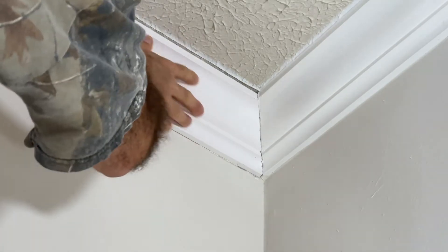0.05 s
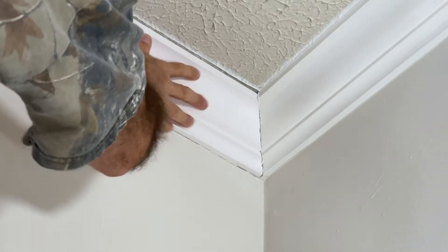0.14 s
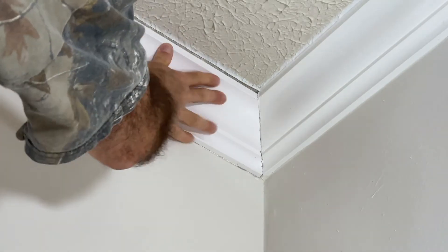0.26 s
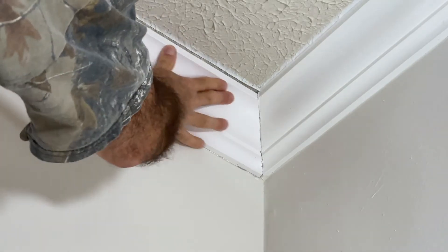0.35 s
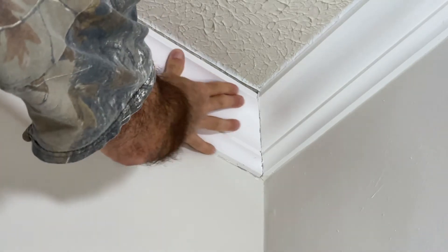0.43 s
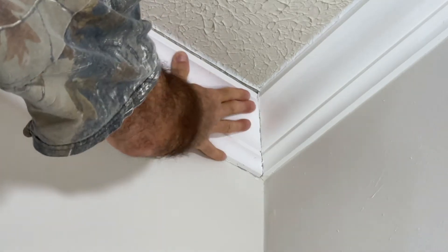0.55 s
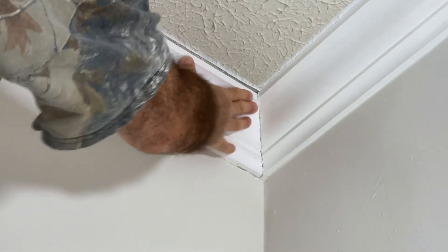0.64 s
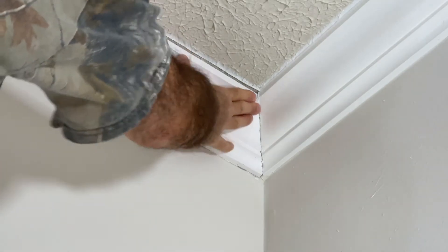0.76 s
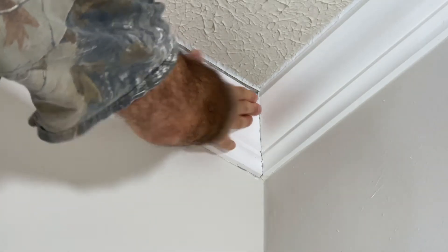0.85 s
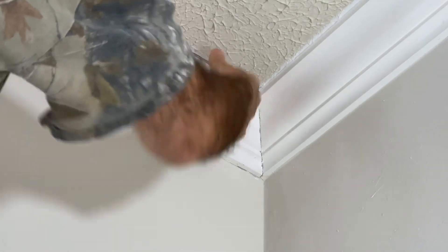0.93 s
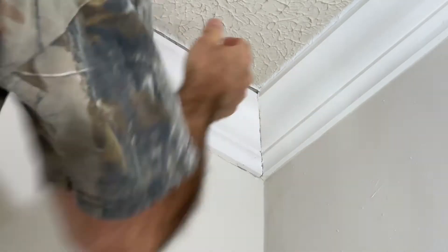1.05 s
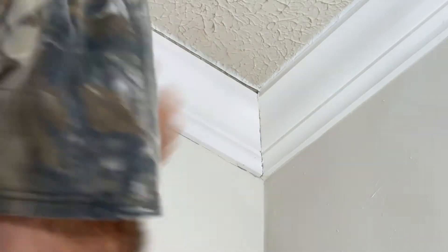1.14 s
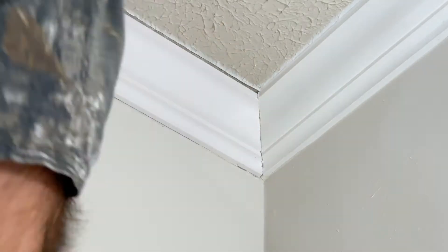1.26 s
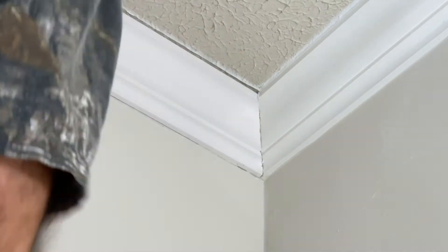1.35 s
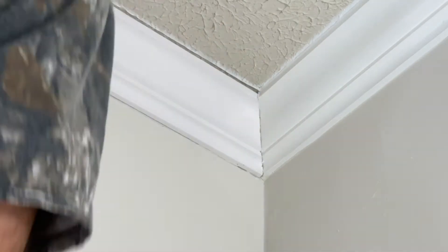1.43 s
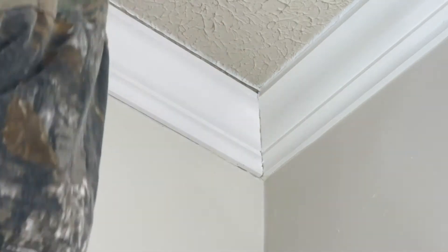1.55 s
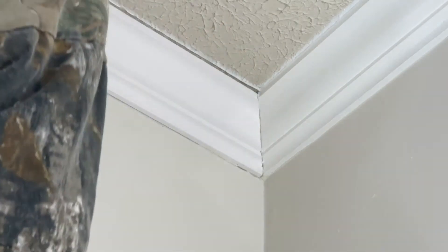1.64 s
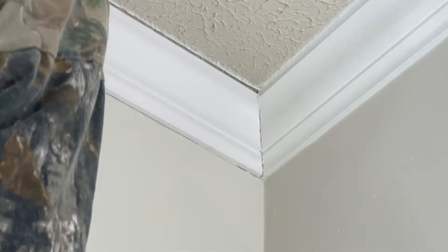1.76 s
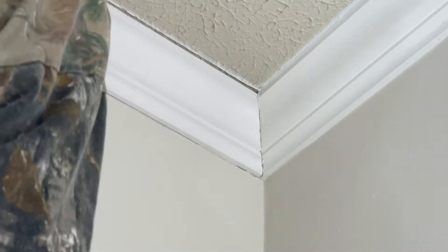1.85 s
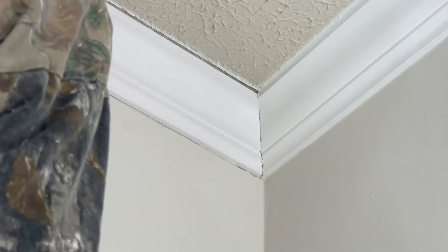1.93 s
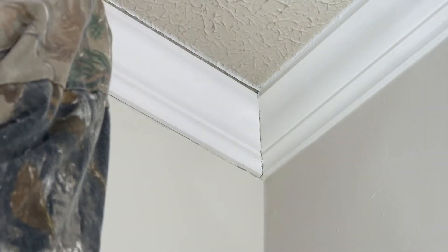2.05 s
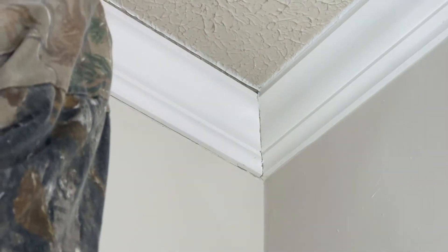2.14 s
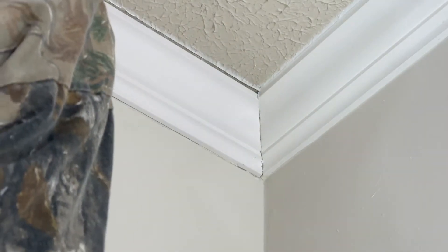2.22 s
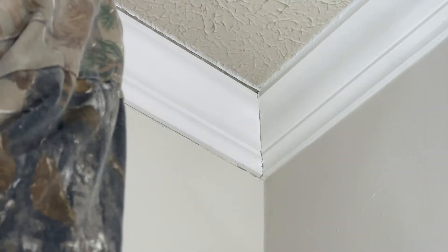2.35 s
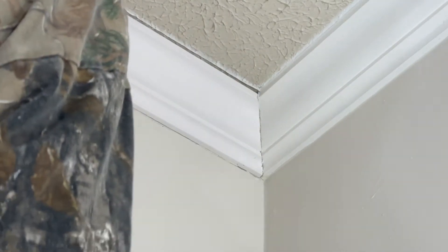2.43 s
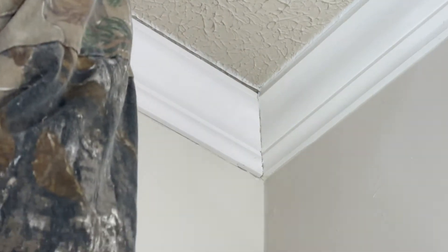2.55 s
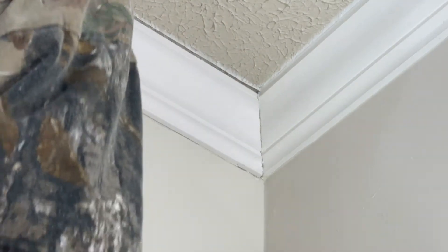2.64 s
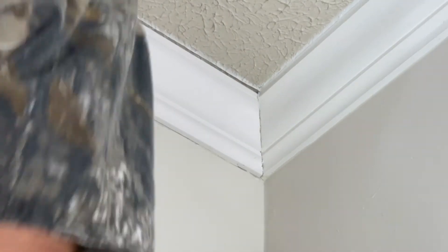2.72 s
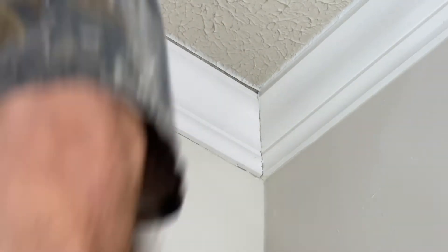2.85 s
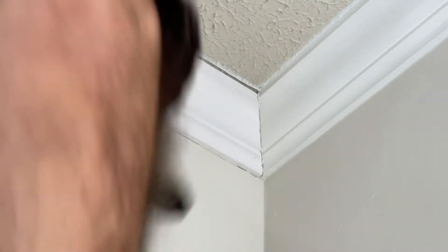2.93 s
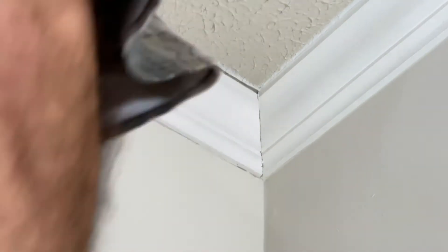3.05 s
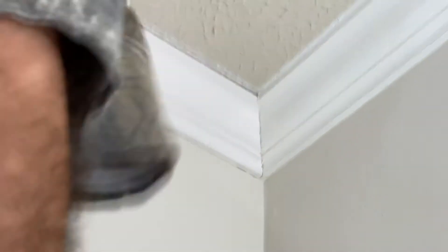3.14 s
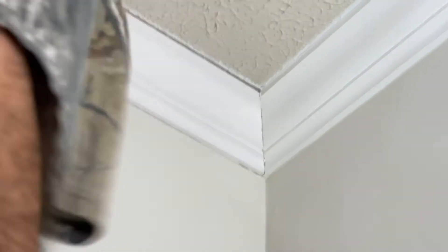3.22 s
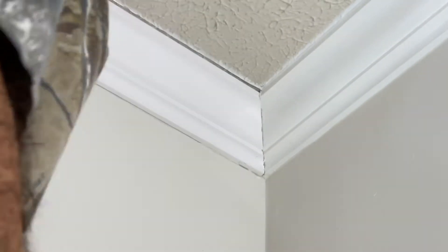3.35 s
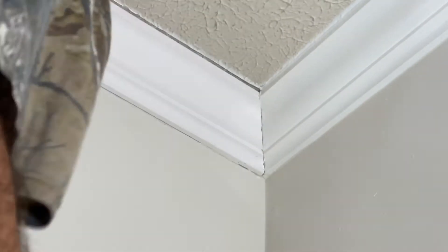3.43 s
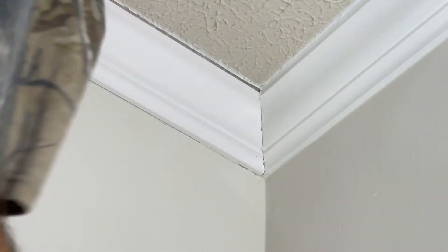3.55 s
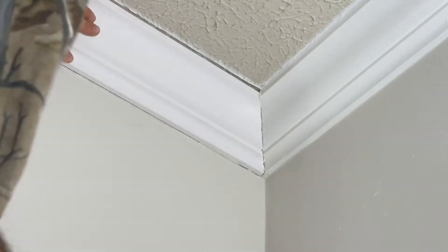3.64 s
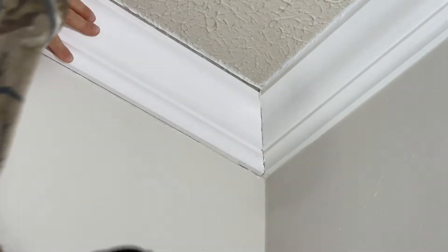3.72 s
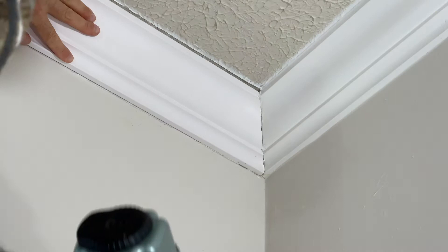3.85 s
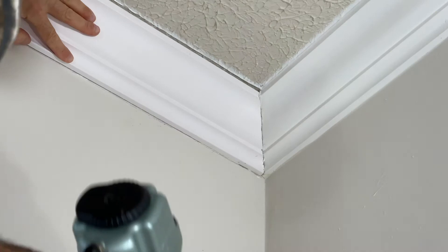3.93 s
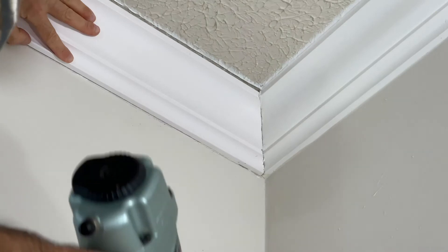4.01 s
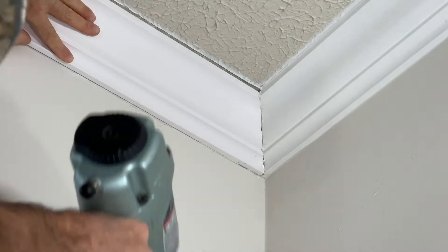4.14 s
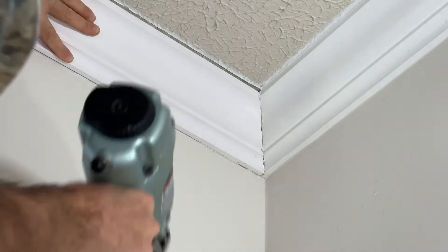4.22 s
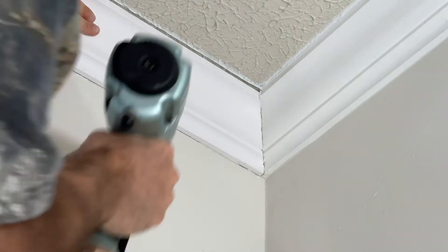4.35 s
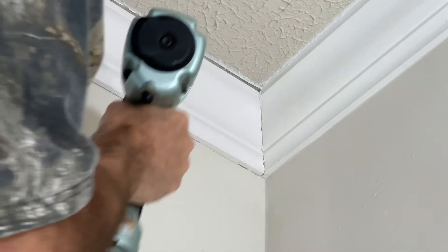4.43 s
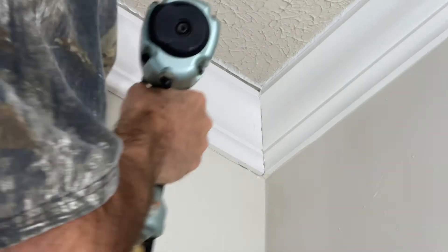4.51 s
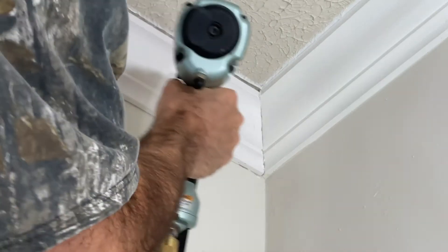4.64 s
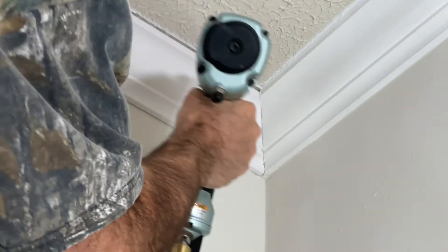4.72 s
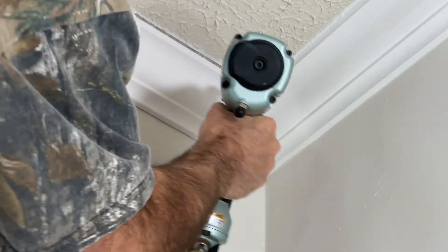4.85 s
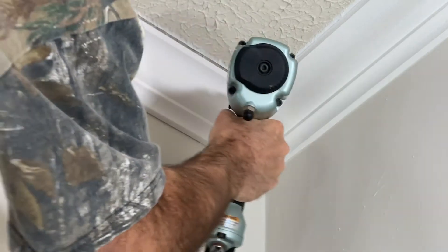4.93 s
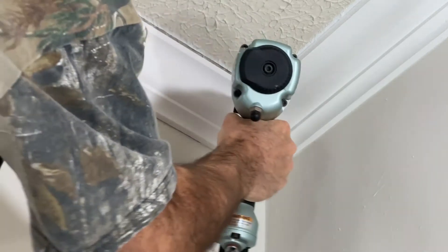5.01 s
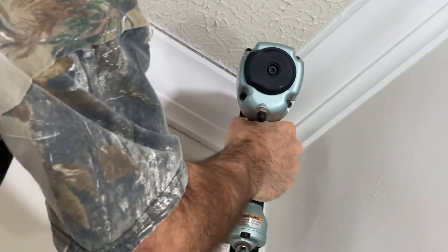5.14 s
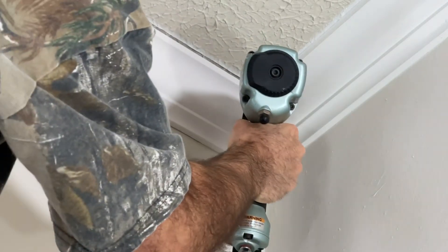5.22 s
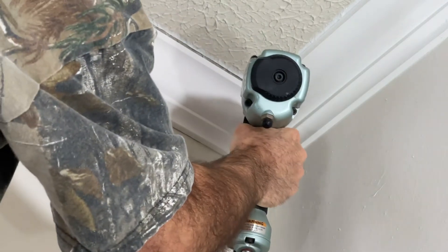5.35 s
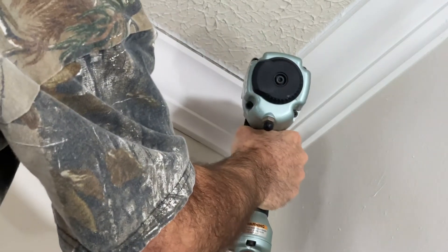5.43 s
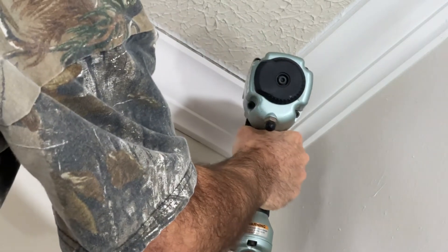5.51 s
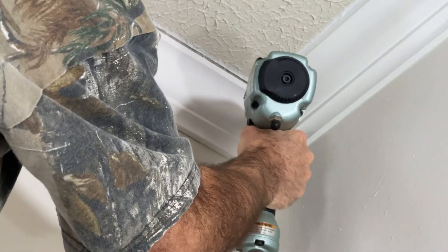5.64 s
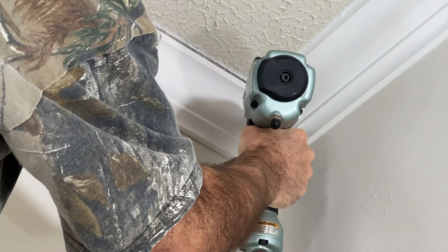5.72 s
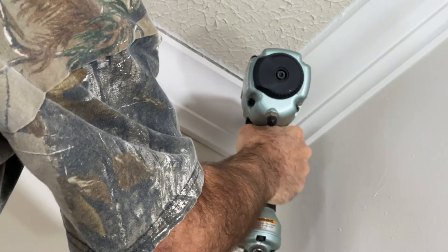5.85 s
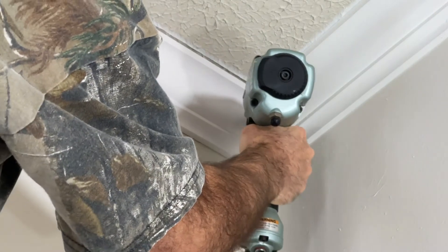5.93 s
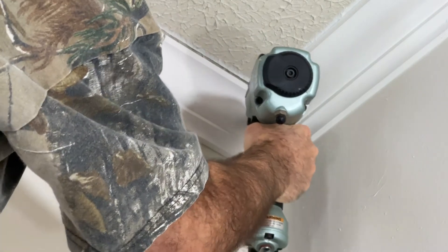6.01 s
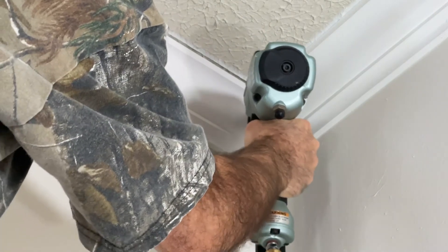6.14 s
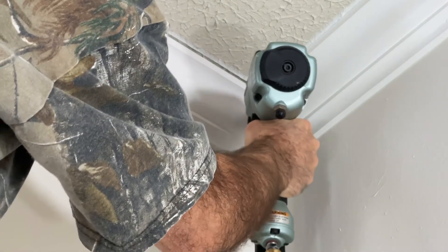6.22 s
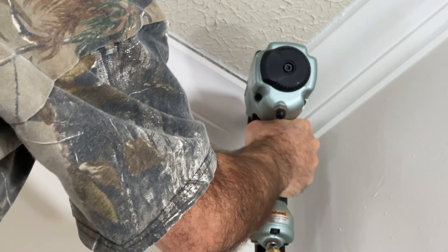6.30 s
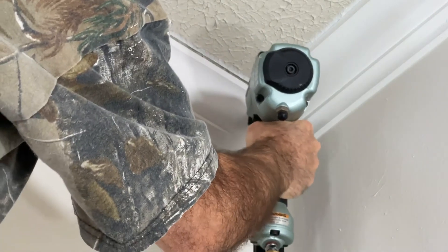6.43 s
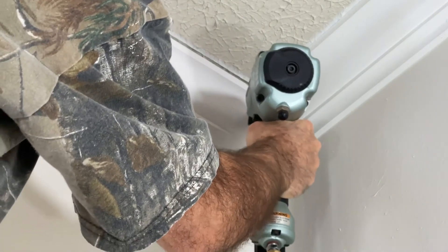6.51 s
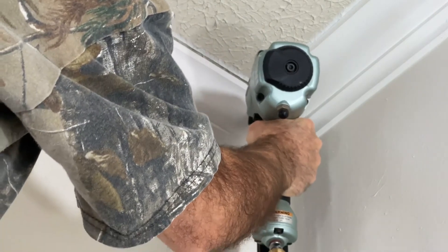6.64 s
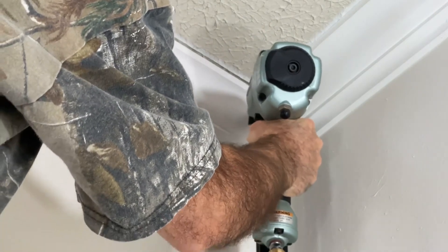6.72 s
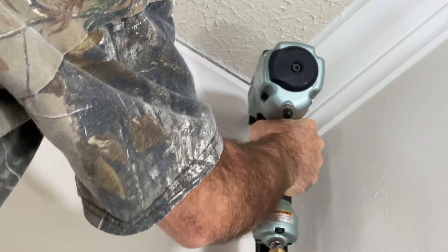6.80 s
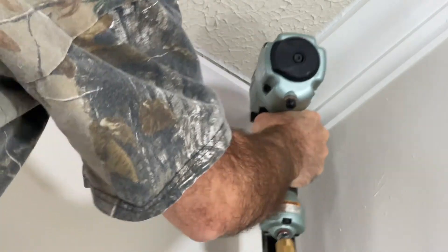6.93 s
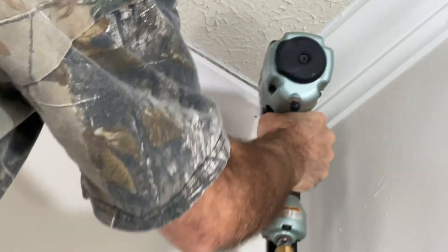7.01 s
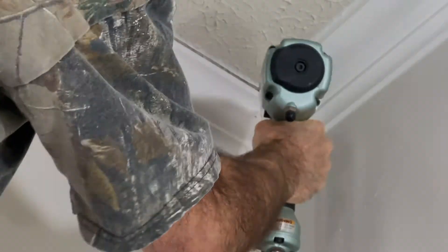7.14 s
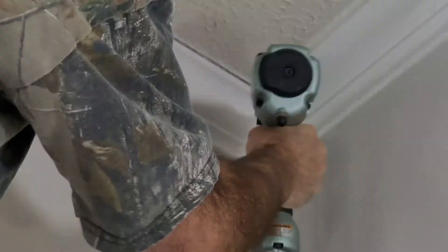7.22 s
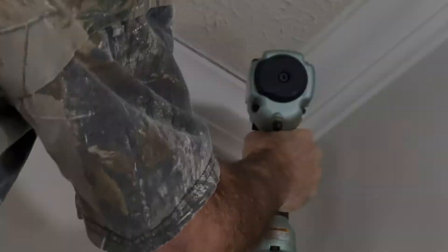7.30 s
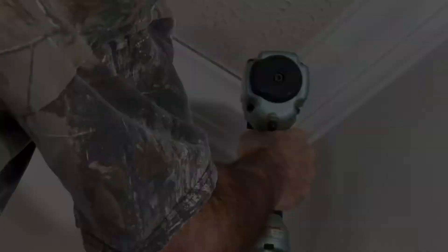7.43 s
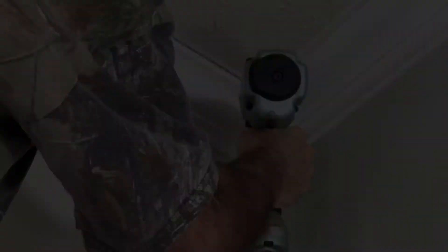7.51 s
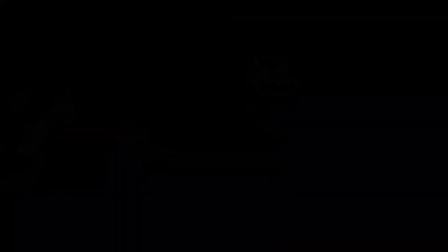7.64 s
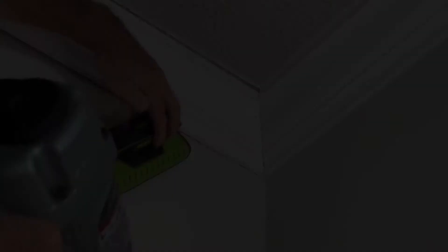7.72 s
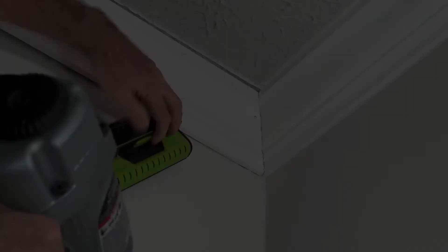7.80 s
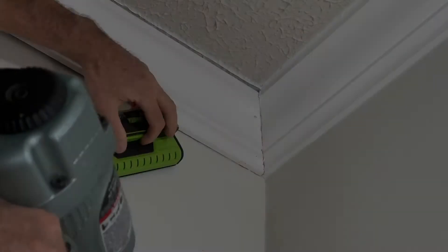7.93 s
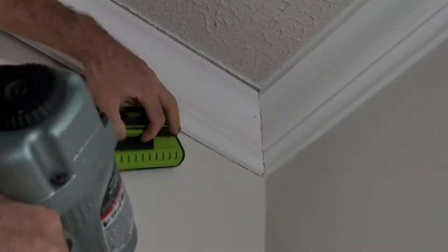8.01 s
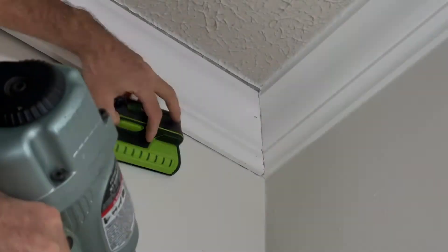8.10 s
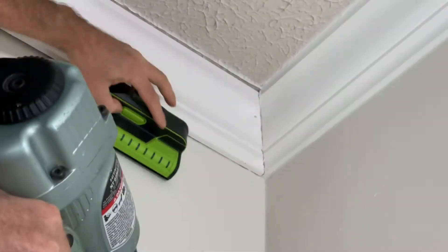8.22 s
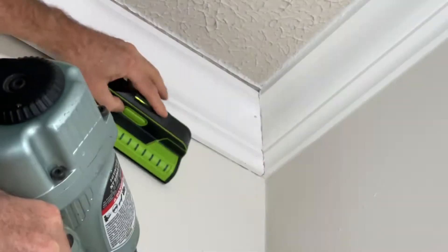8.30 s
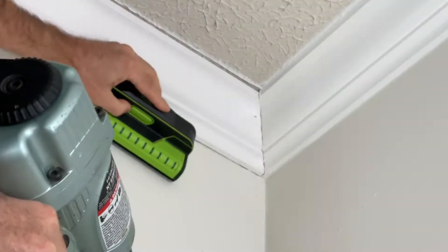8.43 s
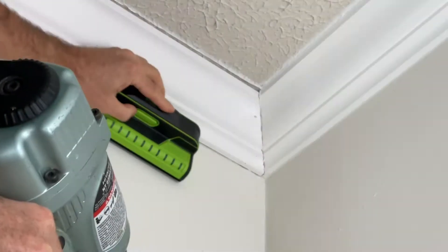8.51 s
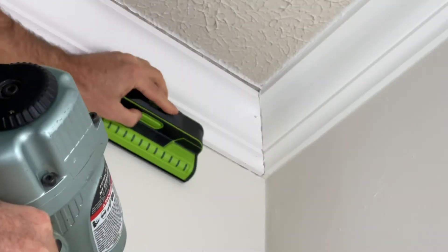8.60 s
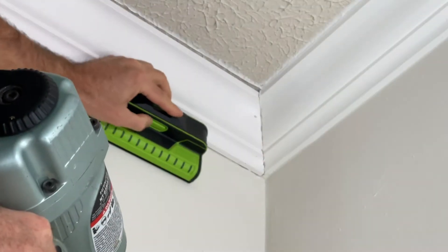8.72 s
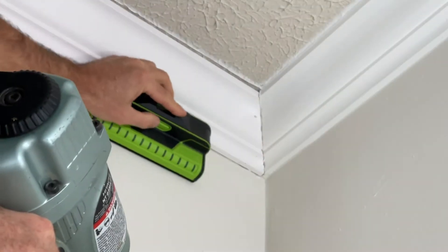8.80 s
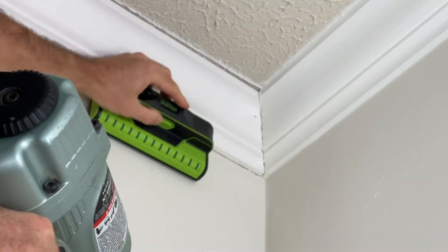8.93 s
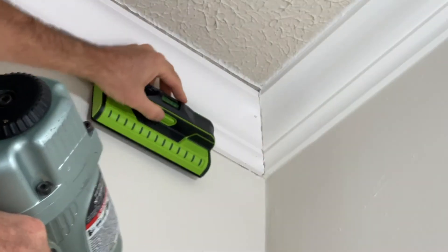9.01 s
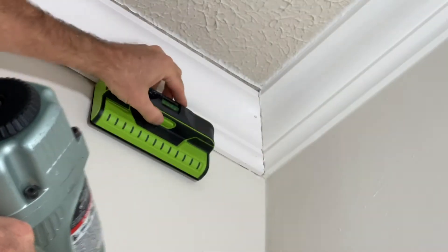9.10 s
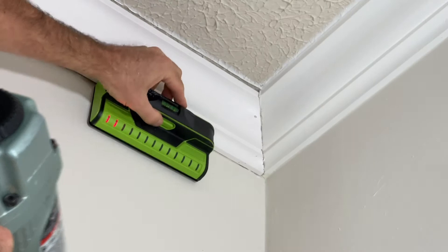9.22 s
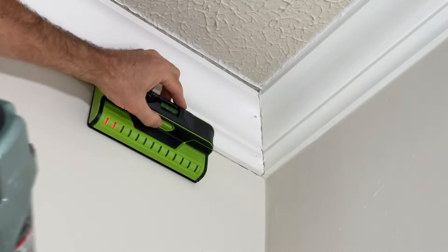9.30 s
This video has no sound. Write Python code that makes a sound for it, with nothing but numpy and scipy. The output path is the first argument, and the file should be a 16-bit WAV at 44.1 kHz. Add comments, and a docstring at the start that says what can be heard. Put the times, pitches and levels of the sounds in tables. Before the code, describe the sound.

Quiet handling of molding near the microphone: faint thumps, rubbing skin, brushing cloth, small clicks and squeaky slips. Firmer wooden knocks follow as a nailer is placed. One violent air-driven shot cracks, with short room tail, followed by a bright exhaust burst and soft refill hiss. After a quick fade, low thuds and short gritty plastic slides return over a faint room rumble.

```python
"""Crown molding is pressed into a ceiling corner of a bare room: struck modes knock, slipping skin squeaks,
strokes of shaped noise rustle and rub. A pneumatic nailer then fires once: a valve chirp, noise bursts with
metal ringing for driver blow and recoil, a thump in the wall, an exhaust puff and a refill hiss.
The sound fades far down, then returns with a plastic stud finder set down and slid on the wall as scraping
noise. A room tail follows the sources; a faint rumble and hiss lie under everything."""
import sys
import numpy as np
from scipy import signal
from scipy.fft import rfft, irfft, next_fast_len
from scipy.io import wavfile
from scipy.ndimage import uniform_filter1d, map_coordinates

SR = 44100
rng = np.random.default_rng(int(sys.argv[2]) if len(sys.argv) > 2 else 0)


def persist_wave(psi):
    """Save psi, clipped to +-1, as 16-bit WAV."""
    counts = np.round(np.clip(psi, -1, 1) * 32767).astype(np.int16)
    wavfile.write(sys.argv[1], SR, np.atleast_2d(counts).T)


N = 412731

# blows of the shot: (time [s], level [dB], rise [s], t60 [s], treble tilt [dB/octave], ring [Hz], ring level [dB])
BLOWS = [(6.8127, -14, 0.0011, 0.088, 4, 9300, -7), (6.8204, -5.5, .0006, 0.011, -1.5, 2780, -8.5),
         (6.8401, -7.5, 0.00042, 0.032, 1, 1215, 1.5), (6.8448, -13.5, 0.00067, 0.033, -1, 8700, -14.5)]
# colour of the blows before tilt: (frequency [Hz], level [dB])
CRACK_TONE = [(150, -14), (500, 3), (750, -9), (1250, 2), (2000, -8.5), (3000, -3), (4500, -9.5),
              (7000, -14.5), (8800, -7.5), (10500, -4.5), (12000, -12), (14000, -26), (16000, -36)]
# ringing of the nailer's housing: (frequency [Hz], width [Hz], average level [dB])
HOUSING_MODES = [(1277, 71, 3.5), (1992, 84, -7), (3030, 73, 5.5), (4170, 41, -18), (4160, 83, -23.5),
                 (4404, 71, -17), (5100, 49, -21.5), (6420, 82, -8), (7510, 150, -29), (8100, 97, -17),
                 (8400, 89, 7), (10100, 33, 3.5)]
# air whistling through the opening valve: (frequency [Hz], level [dB])
VALVE_TONE = [(200, -28.5), (520, -10.5), (850, -30), (1150, -23.5), (1600, -4.5), (2150, -2), (2600, -34),
              (3300, -14.5), (4300, -44.5), (5700, -25), (6300, -36.5), (7250, -28), (12500, -34),
              (14000, -54.5)]
# colour of the exhaust puff: (frequency [Hz], level [dB])
PUFF_TONE = [(40, 4.5), (100, 3), (300, 0.5), (700, -8), (1500, -12.5), (4500, -12), (5700, -5.5),
             (6500, -7.5), (8600, 0), (10300, 9.5), (11800, -1), (13500, -12), (16000, -22.5)]
# colour of the refill hiss: (frequency [Hz], level [dB])
REFILL_TONE = [(60, -6), (300, -16.5), (900, -16.5), (2400, -10), (3300, 0), (4500, -4), (6300, 1),
               (8500, -1.5), (11000, 8.5), (12500, -10.5), (15000, -13.5)]
# colour of air buffeting the microphone: (frequency [Hz], level [dB])
DRAUGHT_TONE = [(12, -9), (30, -1.5), (60, 4), (115, -3), (170, -17.5), (400, -43), (1500, -100)]
# small hard clicks of the tools: (time [s], level [dB], treble tilt [dB/octave], note of the clicking part [Hz])
CLICKS = [(2.1006, -52, 1.5, 4020), (2.654, -42.5, 3.5, 6540), (3.169, -42.5, 8, 9000),
          (3.216, -45.5, 5.5, 4440), (3.404, -55, 0.5, 2880), (5.777, -56, -10.5, 1670),
          (5.7992, -49, 9, 9500), (5.8837, -36, 8.5, 9160), (6.2, -56.5, 6.5, 9250),
          (6.9451, -36.5, 5.5, 2795), (8.957, -35, 1.5, 2840)]
# knocks on molding and wall: (time [s], level [dB], treble tilt [dB/octave], wall thud level [dB],
# note of the struck spot [Hz], note level in the blow [dB])
KNOCKS = [(.152, -53.5, -11.5, -46.5, 427, 4), (.505, -44, -9.5, -40, 447, 4),
          (.527, -49, -5.5, -41, 487, -8), (.568, -45, -6, -72, 446, 1), (1.278, -58, -7.5, -58, 500, 9),
          (2.202, -49.5, -2.5, -53, 1130, -10), (2.61, -51, -4.5, -59, 373, 2),
          (3.0, -31.5, -2.5, -49.5, 375, 4), (3.012, -36.5, 0.5, -61, 583, 38),
          (3.022, -45, -1, -36, 608, -8), (3.114, -38.5, -6, -45, 2400, 2),
          (3.135, -38.5, -0.5, -51, 667, 19), (3.462, -60.5, -5.5, -58, 790, 0),
          (4.801, -47.5, -4.5, -68, 1600, -9), (5.025, -42.5, -10, -47, 425, 6.5),
          (5.105, -50.5, -10.5, -44.5, 460, 16), (5.312, -33, -3.5, -44, 1014, 10),
          (5.597, -51, -5, -68, 1490, -3), (5.864, -30, -1.5, -41.5, 1640, 0),
          (5.878, -28, -2.5, -36.5, 636, 7.5), (5.907, -40.5, -2, -46, 1275, 11),
          (6.229, -49.5, -5.5, -51.5, 302, 11.5), (6.329, -48, -1, -49.5, 1023, -2.5),
          (6.495, -53.5, -6.5, -56.5, 313, 2.5), (6.717, -50, -3, -50, 394.6, 3),
          (6.736, -46, -5.5, -46.5, 292.5, 1.5), (7.7, -32.5, -3, -24, 329, -15),
          (7.708, -38, -3.5, -38, 1636, 12), (8.055, -39.5, -3.5, -27, 634, 4),
          (8.07, -42, -2.5, -28.5, 395, 13), (8.199, -45, -2.5, -38, 472, 5),
          (8.303, -35.5, -3, -34, 318.4, 2), (8.313, -38.5, -3.5, -34, 472, 14),
          (8.657, -45.5, -4, -40, 306, 0), (8.836, -44.5, -7.5, -40, 571, 3),
          (8.975, -45.5, -8.5, -43, 564, -2), (9.275, -42.5, -2, -42.5, 479, -7.5)]
# bands in which knocks and clicks are balanced: (low edge [Hz], high edge [Hz])
KNOCK_BANDS = [(50, 200), (200, 750), (750, 2000), (2000, 5000), (5000, 11800)]
# the wood's colour, one value per band: level [dB]
KNOCK_VOICE_DB = [1.8, 1.2, 2.5, 0.59, 1.3]
# ringing of molding and wall: (average frequency [Hz], average level [dB], t60 [s])
WOOD_MODES = [(76.6, -7.5, 0.11), (106.4, 5.5, 0.092), (141, -1, 0.12), (253, -5.5, 0.038),
              (328.2, -13, .11), (473, -1, 0.056), (587.6, -6.5, 0.076), (698, -6, 0.053),
              (981, 0.5, 0.082), (1244, -4, 0.11), (1595, -5.5, 0.15), (1762, -9, 0.053),
              (2620, -10.5, 0.12)]
# soft, heavy pushes against the wall: (time [s], level [dB])
PUSHES = [(.039, -47), (.7, -45), (3.28, -45), (3.52, -53.5), (4.41, -50.5), (5.06, -38), (7.928, -40.5),
          (8.408, -45.5)]
# squeaks on the paint: (middle [s], half length [s], slips at top speed before jitter [1/s], level [dB])
SQUEAKS = [(.775, .12, 281, -39.5), (3.102, 0.033, 640, -45.5), (3.14, .025, 620, -37.5),
           (3.29, .04, 770, -59.5)]
# colour of the squeaking fingertip: (frequency [Hz], level [dB])
FINGER_TONE = [(80, -15), (270, -3.5), (470, 5.5), (600, -9), (850, -10), (1100, -14.5), (1380, -29),
               (1700, -13.5), (2200, -36), (6000, -44)]
# the arm moving in its sleeve: (time [s], rustle level [dB])
ARM = [(0.0, -63), (0.34, -60.5), (0.88, -61), (1.02, -67.5), (2.54, -54.5), (2.69, -72), (2.89, -61.5),
       (3.16, -49.5), (3.35, -69), (3.53, -68), (3.72, -65.5), (4.64, -71), (4.79, -63.5), (5.64, -76),
       (5.86, -63), (6.03, -80), (6.32, -79), (6.75, -77)]
# quick swishes of the sleeve: (start [s], length [s], level [dB])
SWISHES = [(.12, 0.2, -57.5), (.45, 0.16, -55), (.72, 0.17, -58), (1.22, 0.12, -59), (1.46, 0.3, -68),
           (1.73, 0.12, -58), (2.02, .16, -56.5), (2.47, 0.24, -55.5), (5.16, 0.12, -55), (8.0, 0.22, -45),
           (8.5, .6, -62.5)]
# strokes of the hand over the molding: (start [s], length [s], level [dB])
RUBS = [(0.117, 0.4, -59.5), (0.457, 0.21, -55), (1.65, 0.21, -63.5), (1.95, .45, -61.5), (2.48, 0.33, -55),
        (2.72, 0.39, -60.5), (3.04, 0.23, -64), (4.307, 0.15, -60), (4.53, .22, -60.5), (5.016, 0.26, -55),
        (5.16, 0.34, -52), (5.495, 0.31, -59), (5.759, 0.19, -45), (6.14, .42, -62)]
# colour of brushing cloth: (frequency [Hz], level [dB])
SLEEVE_TONE = [(200, -41.5), (700, -25.5), (1400, -2), (2800, 0.5), (4500, -4.5), (7000, 0.5), (9000, 3),
               (10500, 8.5), (11700, -5), (13000, -25.5), (16000, -28)]
# colour of skin on wood: (frequency [Hz], level [dB])
RUB_TONE = [(110, -31), (180, -1.5), (203, -7), (236, -5.5), (270, -6.5), (308, -5), (421, 2.5), (462, 1.5),
            (761, -4.5), (1040, -8), (1430, -13), (1660, -9.5), (1780, -11), (4500, -27), (5850, -46),
            (9900, -120)]
# colour of the rumbling wall: (frequency [Hz], level [dB])
RUMBLE_TONE = [(12, -52), (20, -27.5), (41, -5), (65, 4.5), (88, -3.5), (135, -7.5), (232, -7), (280, -11),
               (330, -12), (430, -39.5), (730, -120)]
# slides of the stud finder on the wall: (start [s], length [s], level [dB])
SLIDES = [(7.845, 0.11, -43), (8.0, 0.13, -42.5), (8.13, 0.23, -49), (8.3, 0.41, -58), (8.64, 0.27, -56),
          (8.9, 0.26, -56.5)]
# colour of plastic on wall paint: (frequency [Hz], level [dB])
SCRAPE_TONE = [(150, -36), (250, -5), (609, 0), (735, -9.5), (980, -6.5), (1140, -12), (1560, -6.5),
               (1700, -11.5), (2000, -7.5), (2670, -15.5), (5000, -18.5), (6500, -32.5), (11000, -120)]
# decay of the bare room: (frequency [Hz], t60 [s])
ROOM_DECAY = [(80, 0.39), (250, 0.31), (1000, 0.41), (3000, 0.36), (8000, 0.35), (14000, 0.23)]
# microphone ports: (frequency [Hz], phase by which left leads right [rad])
PORTS = [(50, .03), (200, .15), (700, .35), (1600, -.45), (2300, 0), (3100, .65), (5000, .45), (7000, .03),
         (7800, .55), (8600, 0), (9500, -2), (10300, -3.2), (12000, -6.2), (15000, -12.3)]
# fade-out and return: (time [s], level [dB])
FADER = [(7.17, -4), (7.5, -20), (7.66, -23.5), (7.695, -5.5)]

# exhaust puff: opens, holds, dies
PUFF_S, PUFF_RISE_S, PUFF_HOLD_S, PUFF_T60_S, PUFF_DB = 6.9545, .004, .01, .16, -13
# air refilling the nailer: one swell
REFILL_MID_S, REFILL_WIDTH_S, REFILL_DB = 7.16, 0.16, -41.5
# air buffeting the microphone: a gust from the shot, and a share of puff and refill
GUST_S, GUST_RISE_S, GUST_HOLD_S, GUST_T60_S, GUST_DB = 6.82, 0.0033, .012, .19, -27
DRAUGHT_PER_PUFF_DB, DRAUGHT_PER_REFILL_DB = -12, -7
CLICK_NOTE_DB, CLICK_NOTE_T60_S = -4.5, 0.026  # the part's note beside the crack
NOTE_T60_S = 0.081  # decay of the struck spot's note
KNOCK_PIVOT_HZ, CLICK_PIVOT_HZ = 700, 3200  # treble tilts turn here
SILENT_DB = -140  # the arm outside its table
STROKE_SOFTNESS = 1.1  # exponent of the half-sine swell
STROKE_CREST_DB = 1.5  # the middle of a stroke over its listed level
# the wall rumbles with whatever moves on it
RUMBLE_PER_RUB_DB, RUMBLE_PER_SLEEVE_DB, RUMBLE_PER_SLIDE_DB = -2.5, -4, -7.5
SLIDE_HISS_DB = -9.5  # hiss that goes with the scrape
FLOOR_RUMBLE_DB, FLOOR_HISS_DB = -62.5, -70  # the still room
TOP_HZ = 16200  # nothing passes above


def shot():
    """Air slams the driver down and the recoiling tool lands again: noise bursts, a note and metal ringing."""
    out, t = np.zeros(N), hit_time()
    for s, db, rise, t60, tilt_db, ring_hz, ring_db in BLOWS:
        colour = [(hz, level + tilt_db * np.log2(hz / 3000)) for hz, level in CRACK_TONE]
        crack = noise(colour, size=len(t)) * dying(t, t60)
        ring = amp(ring_db) * dying(t, 0.018) * sine(ring_hz, t)
        burst = crack + ring + amp(-38.0) * metal(t)
        onset = 1 - np.exp(-t / rise)
        add(out, s, amp(db - 3.0) * peak_level(burst * onset))
    return out


def metal(t):
    """The housing's damped modes, each at a new strength and phase."""
    modes = []
    for hz, width, db in HOUSING_MODES:
        strength = amp(db + 2 * rng.normal())
        ring = np.sin(2 * np.pi * (hz * t + rng.random()))
        modes.append(strength * np.exp(-np.pi * width * t) * ring)
    return unit(sum(modes))


def valve():
    """Air squeezes past the opening valve in a brief chirp of whistling noise, just ahead of the main blow."""
    out, t = np.zeros(N), hit_time()
    swell = np.exp(-((t - .014) / 0.0085) ** 2)
    add(out, 6.801, amp(-18) * peak_level(noise(VALVE_TONE, size=len(t)) * swell))
    return out


def thump():
    """The driver's push spreads through the wall and arrives as one falling wave."""
    out, t = np.zeros(N), hit_time()
    impulse = 1. * (t == 0)
    push = bend(band(impulse, [30, 270], order=2), lag=.0065)
    add(out, 6.8195, amp(-11.5) * peak_level(push))
    return out


def air():
    """The released trigger vents the cylinder, the hose refills it, and the draught reaches the microphone."""
    t = clock()
    puff = amp(PUFF_DB) * burst_of_air(PUFF_S, PUFF_RISE_S, PUFF_HOLD_S, PUFF_T60_S)
    swell = np.exp(-((t - REFILL_MID_S) / REFILL_WIDTH_S) ** 2)
    refill = amp(REFILL_DB) * swell * (t > PUFF_S)
    gust = amp(GUST_DB) * burst_of_air(GUST_S, GUST_RISE_S, GUST_HOLD_S, GUST_T60_S)
    draught = gust + amp(DRAUGHT_PER_PUFF_DB) * puff + amp(DRAUGHT_PER_REFILL_DB) * refill
    exhaust = puff * amp(2.5 * wobble(270)) * noise(PUFF_TONE)
    return exhaust + refill * noise(REFILL_TONE) + draught * noise(DRAUGHT_TONE)


def burst_of_air(s, rise, hold, t60):
    """Strength of escaping air: linear attack, hold, exponential release."""
    t = clock() - s
    return np.clip(t / rise, 0, 1) * dying(np.maximum(t - rise - hold, 0), t60)


def clicks():
    """Safety tip, trigger and casings: a short crack of noise with a note and a little metal ring."""
    out, t = np.zeros(N), hit_time()
    for s, db, tilt_db, note_hz in CLICKS:
        ring = amp(-37) * metal(t)
        crack = dying(t, 0.033) * rng.standard_normal(len(t))
        note = amp(CLICK_NOTE_DB) * dying(t, CLICK_NOTE_T60_S) * sine(note_hz, t)
        click = crack + ring + note
        for edges in KNOCK_BANDS[2:]:
            band_db = db + tilt_db * octaves(edges, CLICK_PIVOT_HZ)
            add(out, s, amp(band_db) * peak_level(band(click, edges)))
    return out


def knocks():
    """Each contact rings wood and wall, the struck spot adds its note, and the thud trails as a bending wave."""
    out, t = np.zeros(N), hit_time()
    for s, knock_db, tilt_db, thud_db, note_hz, note_db in KNOCKS:
        ring = wood(t)
        note = amp(note_db) * dying(t, NOTE_T60_S) * sine(note_hz, t)
        contact = amp(17.0) * dying(t, 0.038) * rng.standard_normal(len(t))
        blow = bend(ring + note + contact, lag=.008)
        # the lowest band is the thud; the tilt colours the others
        upper = [knock_db + tilt_db * octaves(edges, KNOCK_PIVOT_HZ) for edges in KNOCK_BANDS[1:]]
        for edges, db, voice_db in zip(KNOCK_BANDS, [thud_db] + upper, KNOCK_VOICE_DB):
            add(out, s - .001, amp(db + voice_db) * peak_level(band(blow, edges)))
    return out


def wood(t):
    """Damped modes of molding and wall, shifted a little in level and pitch at each contact."""
    modes = []
    for hz, db, t60 in WOOD_MODES:
        strength = amp(db + 2 * rng.normal())
        modes.append(strength * dying(t, t60) * sine(hz * (1 + rng.normal() / 20), t))
    return sum(modes)


def pushes():
    """Weight leans on the wall: low noise swells and dies with no click."""
    out, t = np.zeros(N), hit_time()
    for s, db in PUSHES:
        swell = t * dying(t, 0.12)
        push = band(swell * rng.standard_normal(len(t)), [60, 190])
        add(out, s - .015, amp(db) * peak_level(push))
    return out


def squeak():
    """A fingertip sticks and slips on the paint: faster, louder and more evenly as the hand speeds up."""
    out, t = np.zeros(N), hit_time()
    for s, half, top_hz, db in SQUEAKS:
        speed = np.clip(1 - (t / half - 1) ** 2, 0, 1)
        jitter = .006 + .2 * (1 - speed)
        slip_rate = top_hz * speed * (1 + jitter * wobble(150)[:len(t)])
        turns = np.cumsum(slip_rate) / SR
        slips = np.diff(np.floor(turns), prepend=0)  # one pulse per whole turn
        friction = peak_level(slips) + .28 * rng.standard_normal(len(t))
        voiced = filtered(friction, lambda hz: amp(along(FINGER_TONE, hz)) * hz / (hz + 30))
        add(out, s - half, amp(db) * peak_level(speed * voiced))
    return out


def handling():
    """Cloth brushes in small catches, skin rubs the wood and the wall rumbles under the pressure."""
    arm = np.hypot(amp(curves(ARM, SILENT_DB)[0]), strokes(SWISHES))
    hand = strokes(RUBS)
    catches = wobble(45)  # shared by cloth and skin
    sleeve = arm * amp(1.9 * catches + 1.9 * wobble(520)) * noise(SLEEVE_TONE)
    grain = amp(1.3 * catches + 2.5 * wobble(250))
    rub = np.hypot(hand, amp(-4.5) * arm) * grain * noise(RUB_TONE)
    pressure = np.hypot(amp(RUMBLE_PER_RUB_DB) * hand, amp(RUMBLE_PER_SLEEVE_DB) * arm)
    rumble = pressure * amp(0.74 * wobble(14)) * noise(RUMBLE_TONE)
    return sleeve + rub + rumble


def slide():
    """Plastic scrapes over the grain of the wall paint, catching as it goes; the wall rumbles along."""
    grain = amp(2.5 * wobble(400) + 2 * wobble(70))
    scrape = grain * (noise(SCRAPE_TONE) + amp(SLIDE_HISS_DB) * noise(SLEEVE_TONE))
    return strokes(SLIDES) * (scrape + amp(RUMBLE_PER_SLIDE_DB) * noise(RUMBLE_TONE))


def strokes(rows):
    """Strength of rubbing strokes; each swells and eases off."""
    t, total = clock(), np.zeros(N)
    for s, length, db in rows:
        progress = np.clip((t - s) / length, 0, 1)
        swell = np.abs(np.sin(np.pi * progress)) ** STROKE_SOFTNESS
        total += amp(db + STROKE_CREST_DB) * swell
    return total


def room(x, spread):
    """The bare room's tail: noise dying at its own pace per frequency, with spread setting the stereo side."""
    hz, t, z = signal.stft(rng.standard_normal((2, SR)), SR, nperseg=256)
    decay = dying(t, along(ROOM_DECAY, hz)[:, None])
    tail = signal.istft(z * decay, SR, nperseg=256)[1]
    tail = tail * (1 - np.exp(-np.arange(tail.shape[1]) / SR / 0.0024))  # soft onset
    mid, side = signal.fftconvolve(x[None], tail / np.linalg.norm(tail[0]), axes=1)[:, :N]
    # the side part loses its lows and highs
    side = spread * filtered(side, lambda hz: 1 / (1 + (hz / 2500) ** 2) * hz / (hz + 170))
    return np.array([mid + side, mid - side])


def still_room():
    """The house rumbles and hisses faintly: two layers of shaped noise, the rumble wavering."""
    rumble = amp(FLOOR_RUMBLE_DB + 2.0 * wobble(11)) * noise(RUMBLE_TONE)
    hiss = noise([(100, 0), (500, -3.5), (2000, -10), (7000, -18.5), (11500, -24.5), (13500, -50.5)])
    return rumble + amp(FLOOR_HISS_DB) * hiss


def bend(x, lag):
    """Bending waves in a panel: the lower the slower, lag seconds late at 100 Hz."""
    return filtered(x, lambda hz: np.exp(-2j * np.pi * lag * 2 * 10 * np.sqrt(hz)))


def dying(t, t60):
    """Exponential decay by 60 dB in t60 seconds."""
    return np.exp(-np.log(1000) * t / t60)


def sine(hz, t):
    """A steady tone."""
    return np.sin(2 * np.pi * hz * t)


def noise(spectrum, size=N):
    """Coloured noise of rms 1."""
    return unit(filtered(rng.standard_normal(size), lambda hz: amp(along(spectrum, hz))))


def wobble(rate):
    """A smooth random curve, rate knots a second."""
    knots = rng.standard_normal(int(N * rate / SR) + 4)
    return map_coordinates(knots, [np.arange(N) * rate / SR])


def curves(rows, outside=None):
    """One value per sample for each column after the time; beyond the rows it holds, or takes the outside value."""
    s, *cols = np.transpose(rows)
    return [np.interp(clock(), s, c, outside, outside) for c in cols]


def filtered(x, response):
    """x shaped by a complex response of frequency."""
    n = x.shape[-1]
    m = next_fast_len(n + SR // 4)
    return irfft(rfft(x, m) * response(np.fft.rfftfreq(m, 1 / SR)), m)[..., :n]


def band(x, edges, order=3):
    """Causal band-pass."""
    return signal.sosfilt(signal.butter(order, edges, 'band', fs=SR, output='sos'), x)


def along(points, hz):
    """(frequency [Hz], value) points read on a log axis."""
    f, v = np.transpose(points)
    return np.interp(np.log(hz + 1), np.log(f + 1), v)


def octaves(edges, pivot_hz):
    """How many octaves the middle of a band lies above the pivot."""
    return np.log2(np.sqrt(np.prod(edges)) / pivot_hz)


def peak_level(x):
    """Scaled so that its loudest hundredth of a second has rms 1."""
    return x / np.sqrt(uniform_filter1d(x ** 2, SR // 100).max())


def unit(x):
    """Scaled to rms 1."""
    return x / np.sqrt(np.mean(x ** 2) + 1e-20)


def amp(db):
    """Decibels to amplitude."""
    return 10 ** (np.asarray(db) / 20)


def add(track, s, x):
    """Mix x into the track at time s."""
    part = track[round(s * SR):][:len(x)]
    part += x[:len(part)]


def hit_time():
    """Time axis of one blow, in seconds."""
    return np.arange(SR // 3) / SR


def clock():
    """Time axis of the scene, in seconds."""
    return np.arange(N) / SR


def scene():
    """The dry sources are summed; each group gets its own random room tail, level and stereo spread."""
    contacts = np.array([knocks() + pushes(), clicks()])
    blows, ticks = filtered(contacts, lambda hz: amp(along([(11500, 0), (14000, -6.5)], hz)))
    rustle = handling() + squeak() + slide()
    chirp, crack, wall, exhaust = valve(), shot(), thump(), air()
    direct = blows + ticks + rustle + chirp + crack + wall + exhaust
    wood_echo = room(amp(-7.5) * blows, spread=0.37)
    hand_echo = room(amp(-10.5) * rustle + amp(-10.5) * ticks, spread=3.5)
    shot_echo = room(amp(-12) * crack + amp(-20.0) * wall, spread=1.2)
    air_echo = room(amp(-11.5) * chirp + amp(-16) * exhaust, spread=0.88)
    return direct + wood_echo + hand_echo + shot_echo + air_echo + still_room()


def record(dry):
    """The two ports differ in phase; the loudest peaks are rounded off, the fader dips, the band ends."""
    pair = filtered(dry, lambda hz: np.exp(.5j * np.outer([1, -1], along(PORTS, hz))))
    toned = filtered(pair, lambda hz: amp(along([(11500, 2.0), (13500, -8.0), (16000, -1.5)], hz)))
    rounded = toned / (1 + (toned / .9) ** 6) ** (1 / 6)
    faded = rounded * amp(curves(FADER)[0])
    return filtered(faded, lambda hz: np.clip((TOP_HZ - hz) / 400, 0, 1))


dry = scene()
out = record(dry)
persist_wave(out)
```